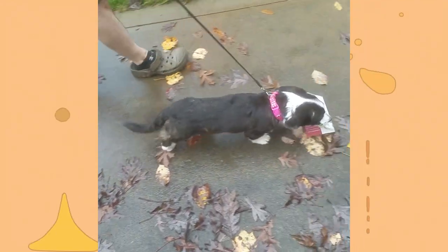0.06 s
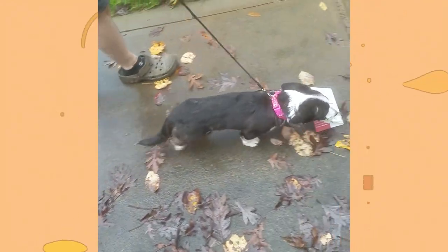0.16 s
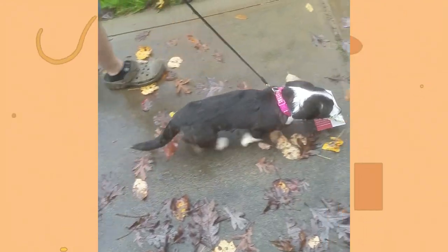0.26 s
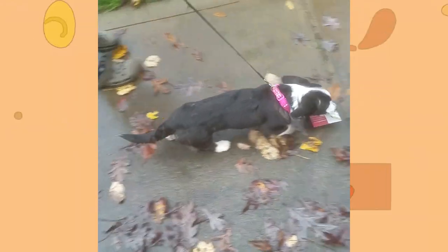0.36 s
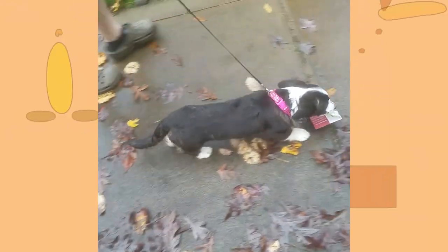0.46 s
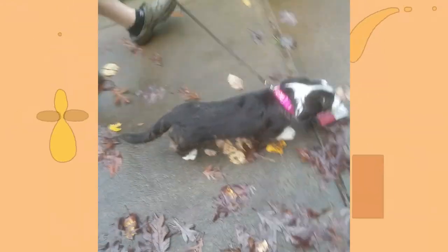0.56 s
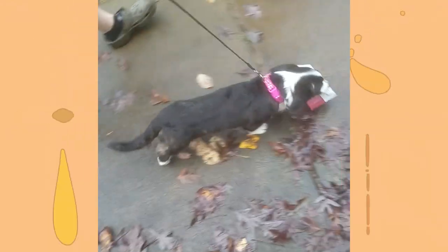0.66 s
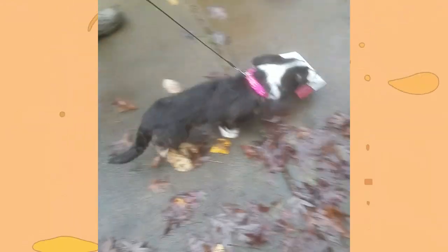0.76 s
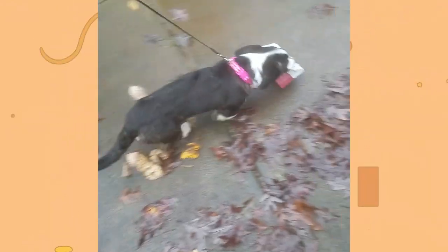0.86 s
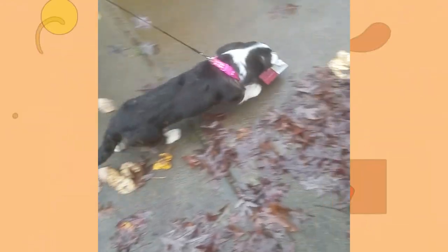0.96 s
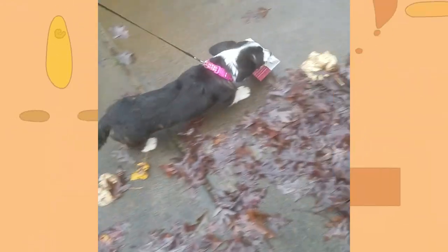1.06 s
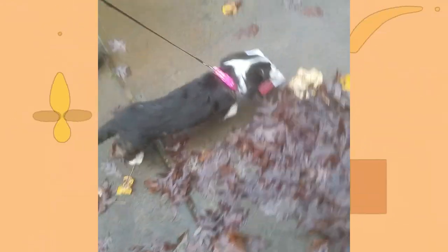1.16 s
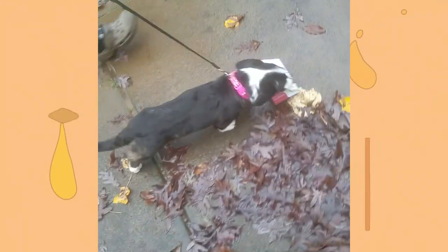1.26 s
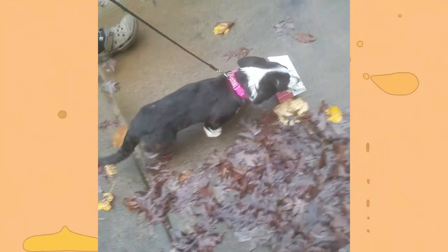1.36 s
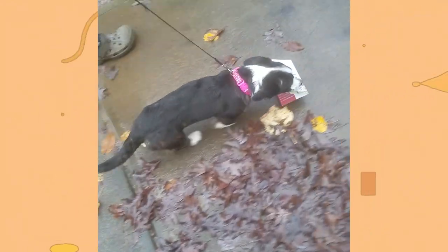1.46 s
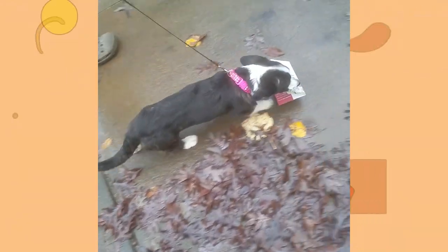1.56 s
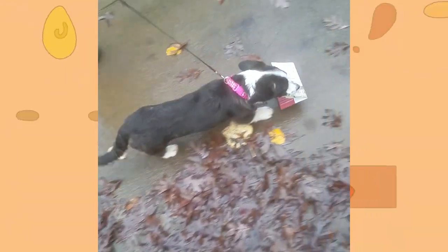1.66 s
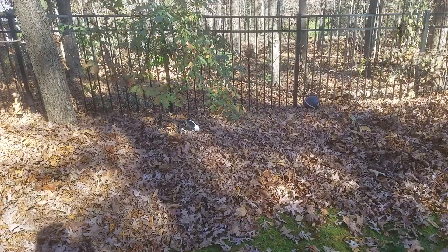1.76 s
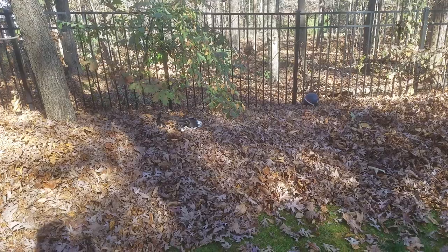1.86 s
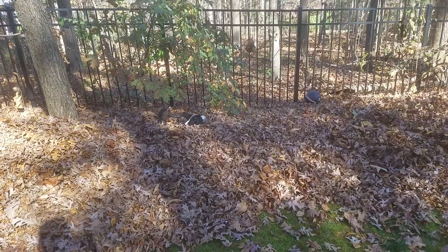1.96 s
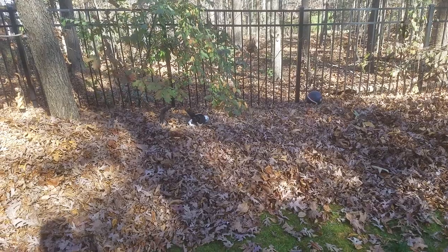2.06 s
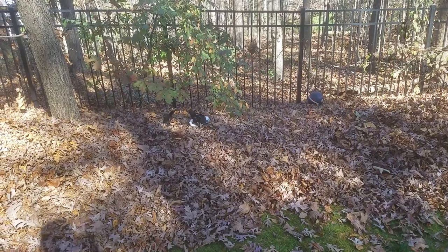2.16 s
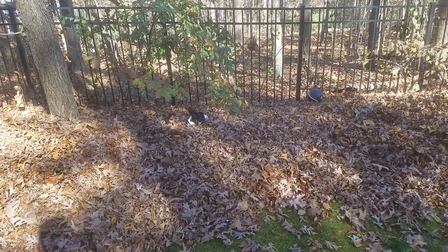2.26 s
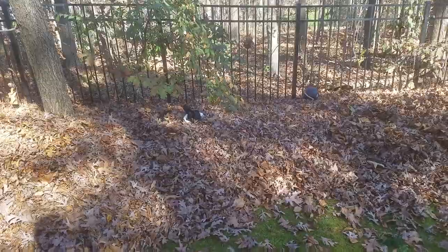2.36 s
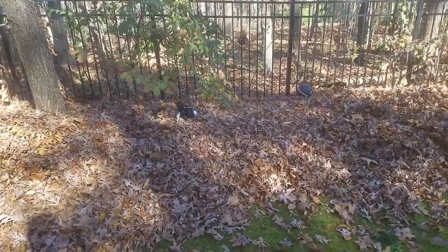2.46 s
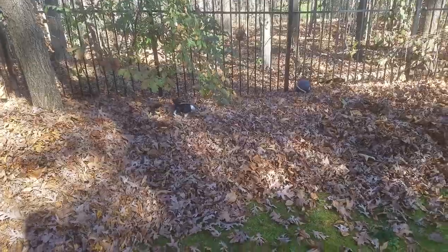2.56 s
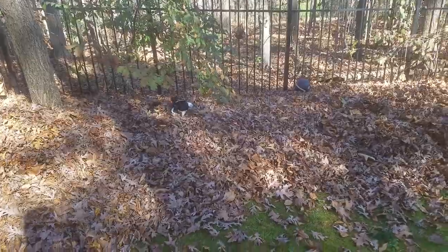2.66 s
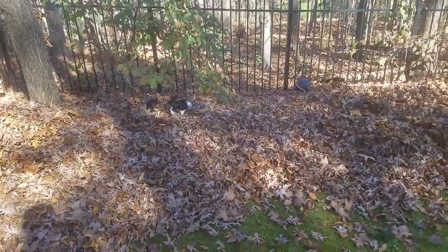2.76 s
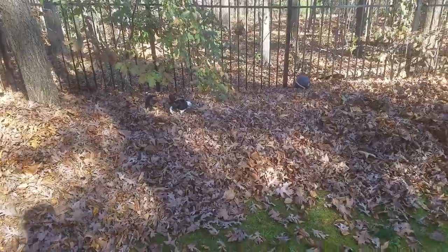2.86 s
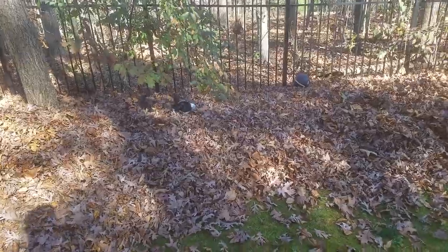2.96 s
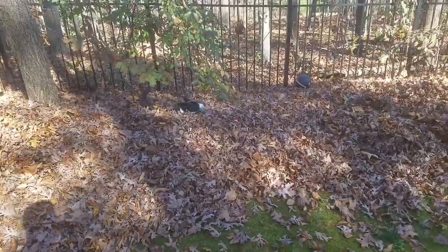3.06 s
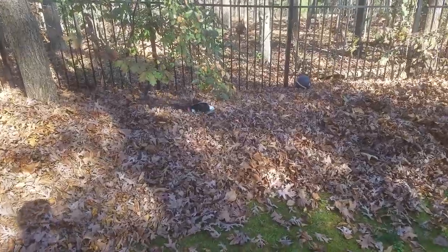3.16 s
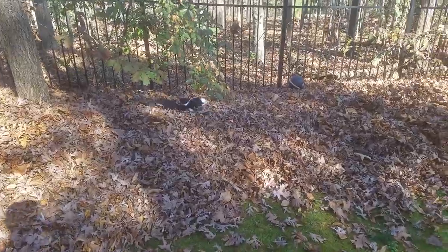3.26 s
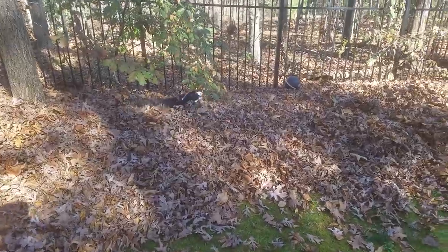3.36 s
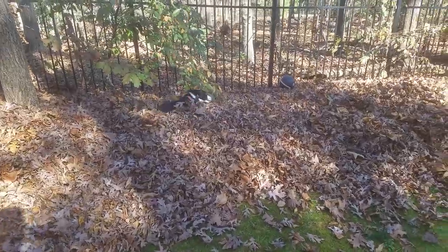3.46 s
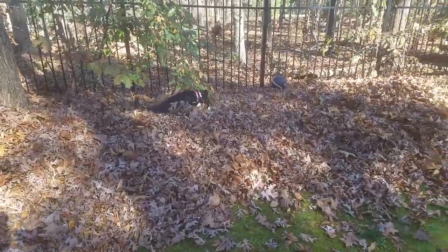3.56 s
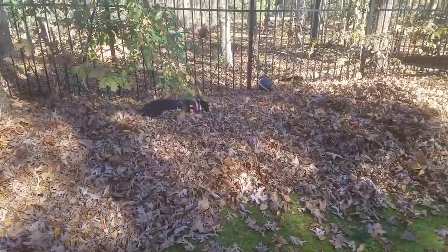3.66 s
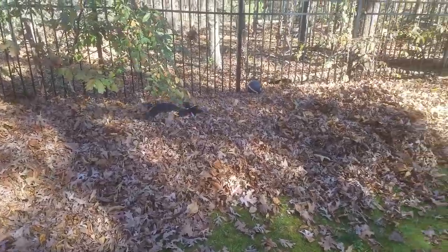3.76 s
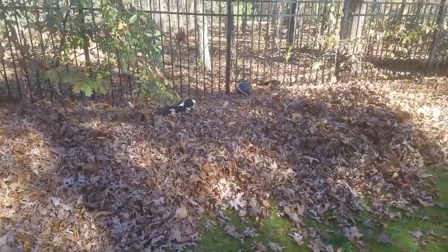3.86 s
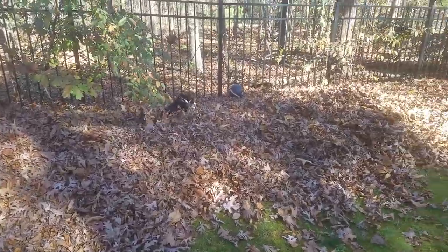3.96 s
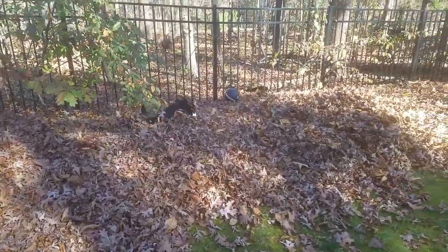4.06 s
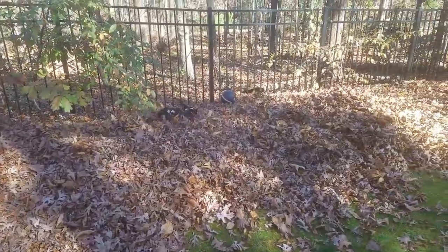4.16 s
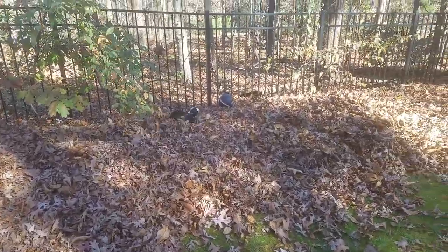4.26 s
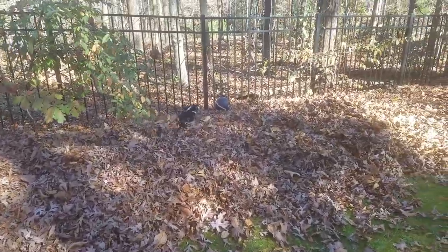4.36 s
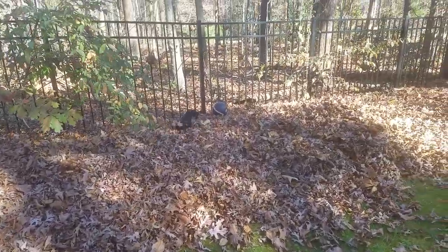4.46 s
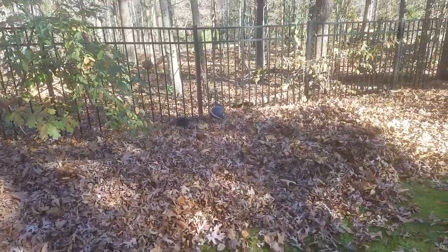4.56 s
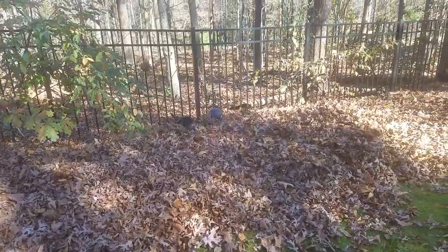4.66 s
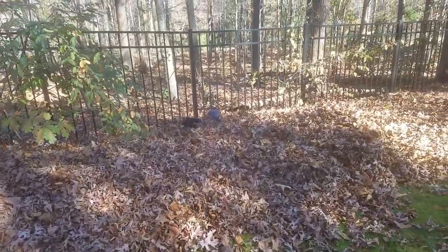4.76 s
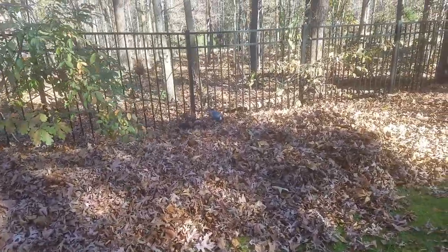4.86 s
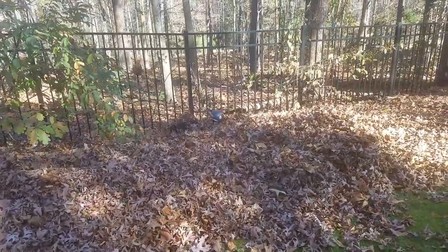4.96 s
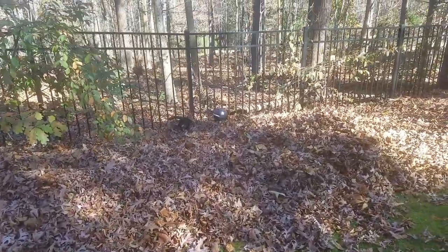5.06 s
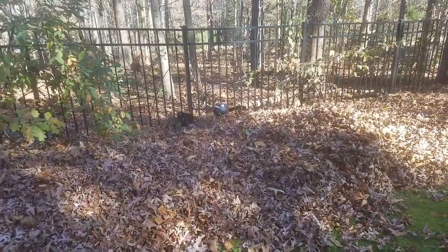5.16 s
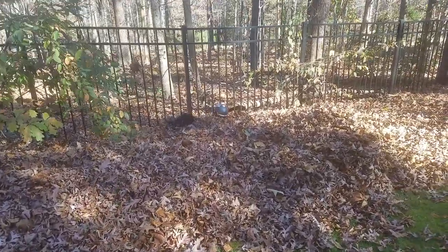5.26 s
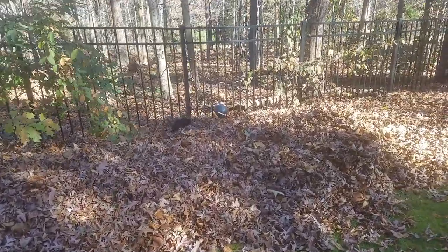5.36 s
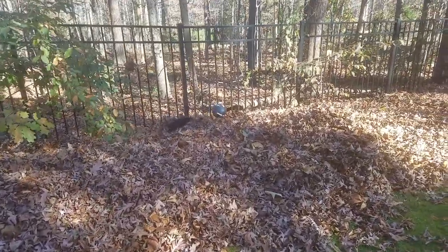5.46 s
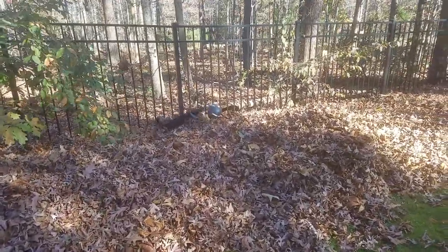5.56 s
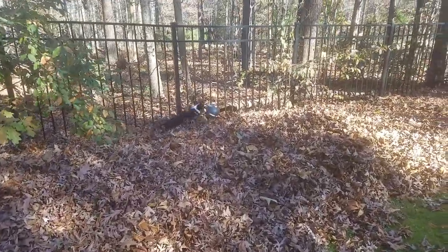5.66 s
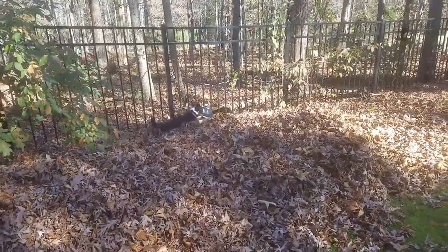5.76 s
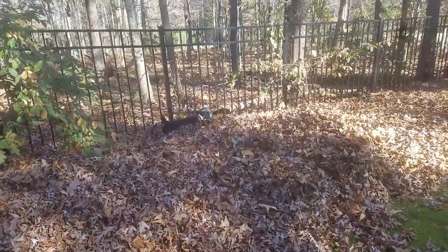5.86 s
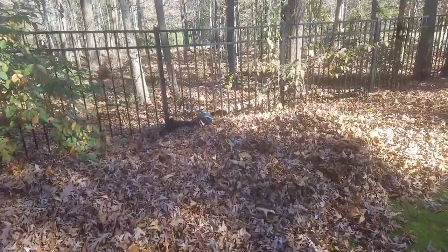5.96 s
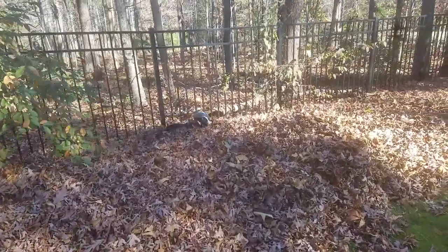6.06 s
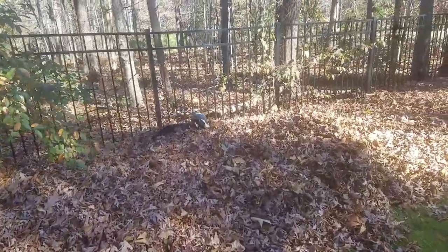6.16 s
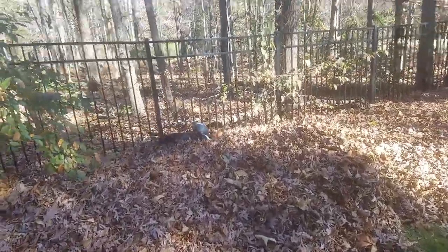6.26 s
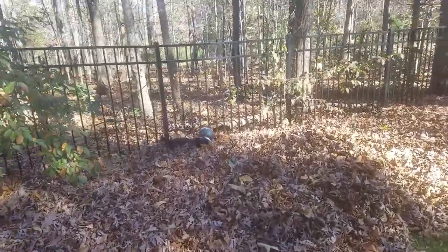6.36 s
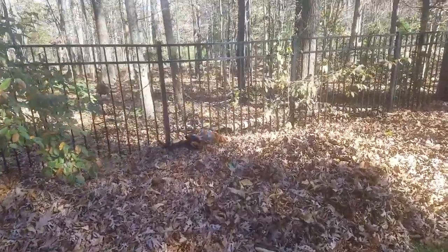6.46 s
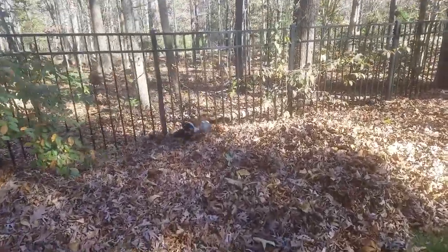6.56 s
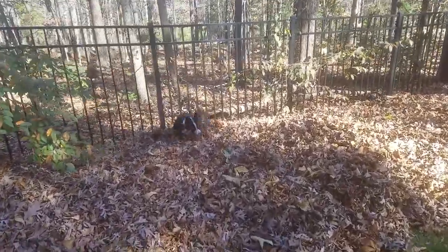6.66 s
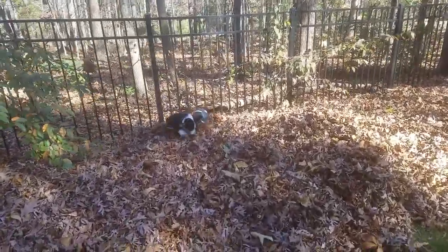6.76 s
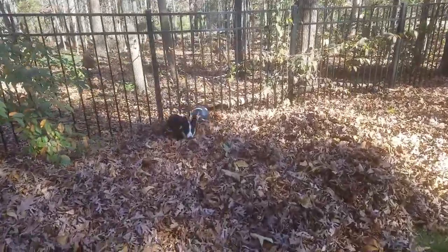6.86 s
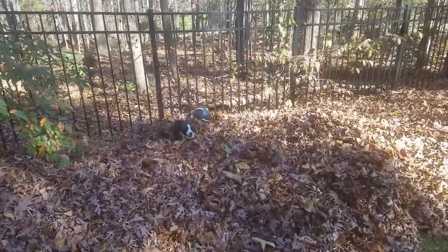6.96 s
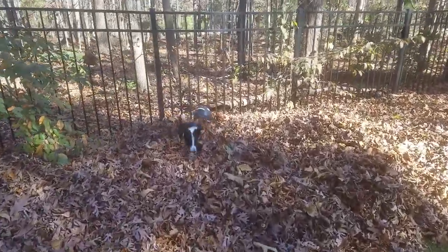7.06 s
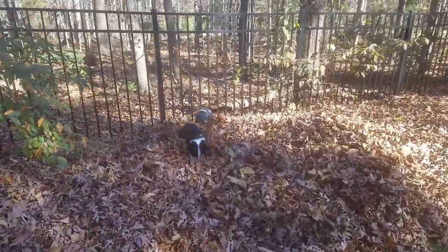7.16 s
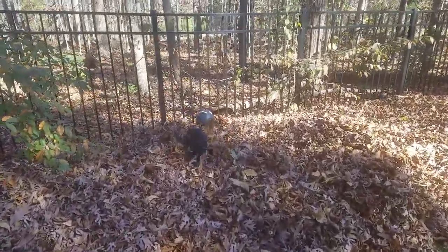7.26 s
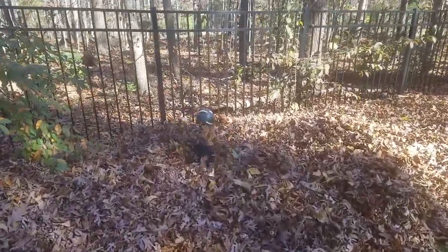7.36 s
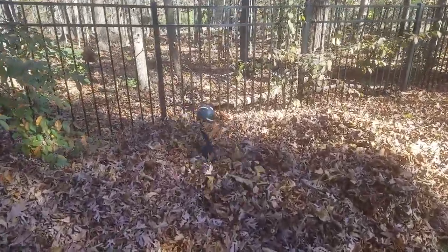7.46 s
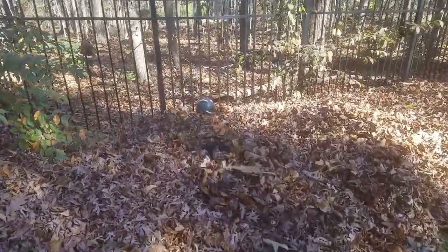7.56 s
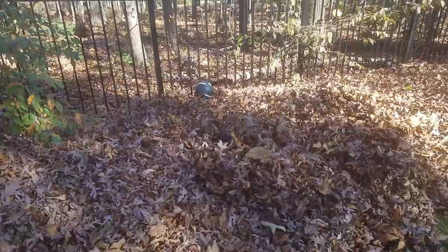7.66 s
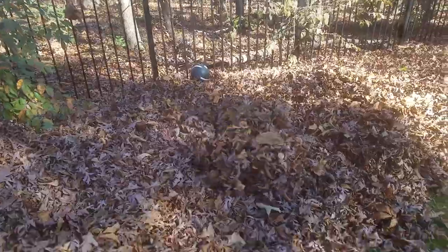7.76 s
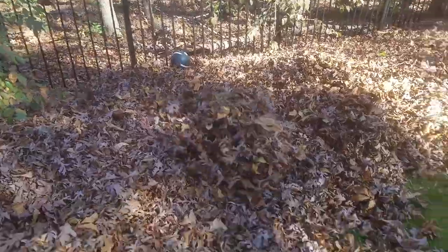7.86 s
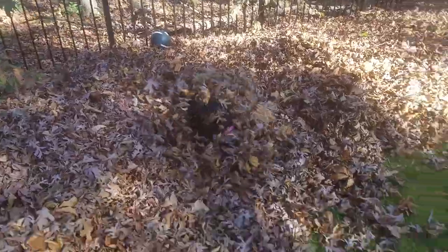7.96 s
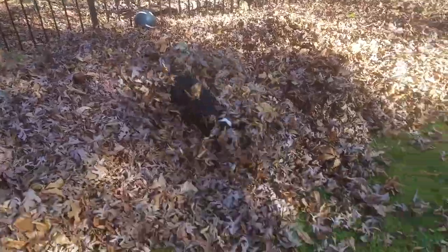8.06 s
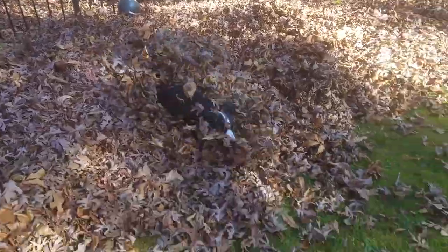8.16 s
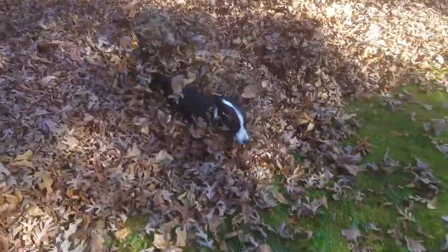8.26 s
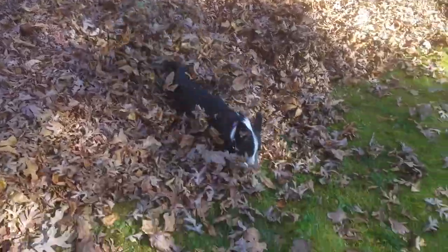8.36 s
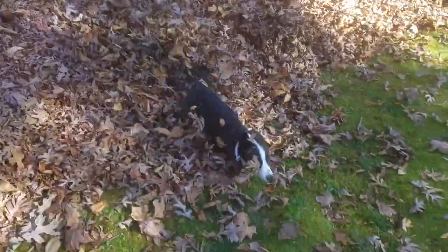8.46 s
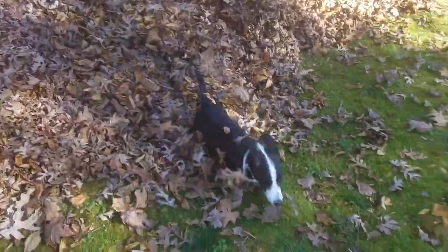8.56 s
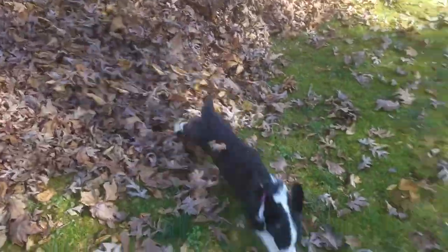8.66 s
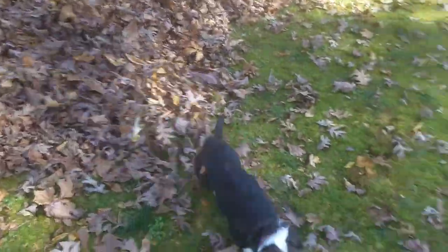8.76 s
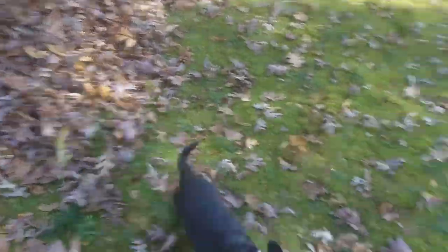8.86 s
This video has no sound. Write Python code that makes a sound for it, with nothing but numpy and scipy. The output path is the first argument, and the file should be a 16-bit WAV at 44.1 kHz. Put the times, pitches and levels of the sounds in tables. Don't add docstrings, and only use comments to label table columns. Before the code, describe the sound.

Outdoors, close handheld stereo microphone. First, very soft wet scrapes, claw ticks and sole drags on a path. A hard cut, then a deep dry leaf pile: distant swishing in rhythmic shoves, a cluster of dry twig snaps, a lull with separate rustles, and finally fast bounding crunches that grow loud and bright as the puppy arrives. Faint traffic rumble and low pile thumps sit below.

```python
import sys
import numpy as np
from scipy import signal
from scipy.fft import rfft, irfft, next_fast_len
from scipy.io import wavfile
from scipy.ndimage import uniform_filter1d, map_coordinates

SR = 44100
rng = np.random.default_rng(int(sys.argv[2]) if len(sys.argv) > 2 else 0)


def transcribe(signal):
    frames = np.atleast_2d(signal).T
    limited = np.clip(frames, -1, 1)
    pcm = np.round(limited * 32767).astype(np.int16)
    wavfile.write(sys.argv[1], SR, pcm)


def convert_level_to_amplitude(level_db):
    exponent = np.asarray(level_db, float) / 20
    return 10 ** exponent


N = 392931
PATH_SIZE = int(1.8 * SR)
PATH_END_S, YARD_START_S = 1.7385, 1.7512


def unit(x):
    return x / np.sqrt(np.mean(x ** 2) + 1e-20)


def along(points, hz):
    f, value = np.transpose(points)
    return np.interp(np.log(hz + 1), np.log(f + 1), value)


def curves(rows):
    s, *columns = np.transpose(rows)
    return [np.interp(np.arange(N) / SR, s, column) for column in columns]


def wobble(rate_hz):
    steps = np.arange(0, N + 32, 32)
    knots = rng.standard_normal(int(N * rate_hz / SR) + 4)
    return np.interp(np.arange(N), steps, map_coordinates(knots, [steps * rate_hz / SR]))


def filtered(x, response):
    m = next_fast_len(x.shape[-1] + 8192, True)
    return irfft(rfft(x, m) * response(np.fft.rfftfreq(m, 1 / SR)), m)[..., :x.shape[-1]]


def crackle(count, cycles, spread_db, size=N):
    draw = rng.random((count, 4))
    hz = np.geomspace(400, 16000, 300)[:, None]
    turns = hz * np.arange(96) / SR
    shapes = hz * np.sin(2 * np.pi * turns) * turns * np.exp(-turns / cycles)
    force = convert_level_to_amplitude(-spread_db * np.log(draw[:, 2:3] + 0.019)) * np.sign(draw[:, 3:] - .5)
    grains = force * shapes[(draw[:, 1] * len(hz)).astype(int)]
    at = (draw[:, :1] * size).astype(int) + np.arange(turns.shape[1])
    return unit(np.bincount(at.ravel(), grains.ravel(), size + turns.shape[1])[:size])


def patchy(depth_db, size=N):
    z = signal.stft(rng.standard_normal((2, size)), nperseg=512)[2]
    field = uniform_filter1d(rng.standard_normal(z.shape[1:]), size=8, axis=0)
    field = uniform_filter1d(field, size=6, axis=1)
    return unit(signal.istft(z * convert_level_to_amplitude(depth_db * unit(field)), nperseg=512)[1][:, :size])


def ports(pair, spectrum, alike, lean, lead):
    m = next_fast_len(pair.shape[1] + 8192, True)
    hz = np.fft.rfftfreq(m, 1 / SR)
    turn = np.arccos(np.clip(along(alike, hz), -1, 1)) / 2
    mid, side = rfft(pair, m) * convert_level_to_amplitude(along(spectrum, hz)) * [np.cos(turn), np.sin(turn)]
    half = convert_level_to_amplitude(along(lean, hz) / 2) * np.exp(.5j * along(lead, hz))
    return unit(irfft([(mid + side) * half, (mid - side) / half], m)[:, :pair.shape[1]])


def played(x, level_db, shifts_db, edges_hz, main):
    below = list(filtered(x, lambda hz: 1 / (1 + (hz / np.reshape(edges_hz, (-1, 1, 1))) ** 6)))
    ranges = list(np.diff([0 * x, *below, x], axis=0))
    body = ranges.pop(main)
    gain = convert_level_to_amplitude(level_db) / np.sqrt(np.mean(body.mean(0) ** 2))
    return gain * (body + sum(convert_level_to_amplitude(db) * part for db, part in zip(shifts_db, ranges)))


# t/s, effort/dB, depth in the leaves/dB
PLOUGH = [(1.75, -59, 2.5), (2.75, -58, 4), (2.95, -47, 2), (3.6, -46, 2.5), (4.2, -46, 2.5),
          (4.7, -45.5, 1.5), (5.3, -46, 1), (5.6, -51.5, -2), (6.05, -58, 1.5), (6.62, -50, -2),
          (6.75, -39, 0), (7.2, -45.5, 1), (7.35, -41, 5.5), (7.5, -37, 3.5), (8.15, -35, 0.5),
          (8.47, -34.5, 0), (8.52, -39, -2.5), (8.91, -47, -0.5)]
# t/s, swell/dB, fall/s
STRIDES = [(1.949, 2.5, 0.074), (2.153, 3, 0.021), (2.318, 1.5, 0.013), (2.96, 2, 0.0094), (3.07, 0.5, .02),
           (3.213, 6.5, 0.12), (3.602, 8.5, 0.12), (3.73, 1.5, 0.022), (3.804, 6, 0.066), (3.98, 2, 0.022),
           (4.157, 7, 0.16), (4.433, 3.0, 0.029), (4.645, 6.5, 0.27), (5.155, 2, 0.07),
           (5.68, -0.5, 0.0092), (5.922, 11, 0.18), (6.167, 9.5, 0.051), (6.328, 11, 0.078),
           (6.522, 8, 0.093), (6.97, 1, .015), (7.026, 4, 0.074), (7.25, 7.5, 0.1), (7.35, 0, .02),
           (7.478, 5.5, 0.053), (7.63, 2, 0.022), (7.72, 1, 0.031), (7.79, 3.5, 0.07), (7.938, 4.5, 0.04),
           (8.1, 3.5, 0.026), (8.135, 4, 0.01), (8.184, 3, 0.017), (8.383, 4.0, 0.034), (8.655, 7.5, 0.029),
           (8.888, 5.5, 0.0054)]
USUAL_EFFORT_DB = -41


def ploughing():
    effort_db, depth_db = curves(PLOUGH)
    s, swell_db, fall = np.transpose(STRIDES)
    rise_over_fall = 1.49
    t = np.arange(0, N, 32) / SR
    late = (t[:, None] - s) / fall
    swell = np.exp(-np.where(late < 0, late / rise_over_fall, late) ** 2) @ swell_db
    return effort_db, depth_db, np.interp(np.arange(N) / SR, t, swell)


# t/s, level/dB
TRAFFIC_LEVEL = [(0.0, -79), (0.05, -72.5), (1.59, -73.5), (1.64, -63), (1.69, -74.5), (1.81, -55.5),
                 (2.38, -66.5), (4.57, -70), (4.89, -59), (4.91, -66.5), (6.97, -71), (7.5, -55),
                 (8.14, -55.5), (8.19, -45), (8.22, -56), (8.91, -55.5)]
# f/Hz, level/dB per Hz
TRAFFIC_SPECTRUM = [(15, -46), (25, -18), (52, -2), (75, -0.5), (108, 2), (200, -14), (260, -35),
                    (440, -120)]


def traffic(air):
    level_db, = curves(TRAFFIC_LEVEL)
    alike = [(40, .2), (80, 0.73), (150, 0.68)]
    rumble = ports(air, TRAFFIC_SPECTRUM, alike, [(100, -3.5)], [(100, 0.74)])
    return convert_level_to_amplitude(level_db + 2.0 + 2.7 * wobble(7)) * rumble


# f/Hz, level/dB per Hz
THRASH_SPECTRUM = [(88, -26), (150, -3), (280, 1), (340, -1), (420, -3), (580, -8), (990, -120)]
# t/s, level/dB, spread/s
PAW_THUDS = [
    (1.26, -66, 0.033),
    (1.95, -60, 0.15),
    (4.1, -56, 0.065),
    (4.75, -55, 0.067),
    (3.3, -54, 0.055),
    (6.4, -60.5, .06),
    (9.9, -48, .05),
    (7.3, -47, 0.093),
    (8.35, -43, .04),
]


def thrash(air):
    t = np.arange(N) / SR
    effort_db, depth_db, swell_db = ploughing()
    work_db = uniform_filter1d(effort_db + swell_db, round(0.17 * SR)) - USUAL_EFFORT_DB
    charge_s, charge_rise_s, charge_db = 7.11, 0.26, 11
    charge = charge_db * np.clip((t - charge_s) / charge_rise_s, 0, 1)
    pile = convert_level_to_amplitude(-63.5 + 0.91 * work_db + charge)
    hum = convert_level_to_amplitude(np.where(t > YARD_START_S, -64, -71))
    paws = sum(convert_level_to_amplitude(db) * np.exp(-((t - s) / spread) ** 2) for s, db, spread in PAW_THUDS)
    boom = ports(air, THRASH_SPECTRUM, [(200, 0.86)], [(200, -3.5)], [(200, 0.63)])
    return convert_level_to_amplitude(1.7 * wobble(8.3)) * np.sqrt(pile ** 2 + hum ** 2 + paws ** 2) * boom


def rumble():
    air = patchy(1.0)
    return traffic(air) + thrash(air[:, ::-1])


# t/s, scrape/dB, weight/dB
SCUFF = [
    (0.0, -67.5, 0.5),
    (0.362, -66, 7),
    (0.46, -68, 4.5),
    (0.822, -71, 1),
    (1.022, -69, 3.5),
    (1.138, -66, -1),
    (1.594, -72, 4),
    (1.74, -69.5, 1.5),
]
# f/Hz, level/dB per Hz
PAVING = [(88, -12), (150, -3), (258, -9), (352, -3.5), (618, -1), (751, -4), (2020, -2.5), (3220, -5.5),
          (3620, -6.5), (4060, -7), (9000, -15), (11600, -12), (15500, -11)]
# f/Hz, left-right likeness
PATH_ALIKE = [(100, 0.99), (300, 1), (640, 0.36), (1500, 0.036), (15000, .03)]
# f/Hz, left-right level/dB
PATH_LEAN = [(60, 1), (180, 1), (550, -2.5), (1650, -1.5), (4970, 0), (15000, -6)]


def scuffs():
    grit = np.array([crackle(count=1200, cycles=0.75, spread_db=1.0, size=PATH_SIZE) for port in range(2)])
    raw = patchy(2.0, size=PATH_SIZE) + convert_level_to_amplitude(-9.5) * grit
    scrape_db, weight_db = np.array(curves(SCUFF))[:, :PATH_SIZE]
    bed = ports(raw, PAVING, PATH_ALIKE, PATH_LEAN, [(100, 0)])
    bed = played(bed, scrape_db, (weight_db + 3.0, .4), (1400, 6500), main=1)
    return convert_level_to_amplitude(1.27 * wobble(45.25)) * np.pad(bed, ((0, 0), (0, N - PATH_SIZE)))


def heel():
    land_s, peak_db, push_s = 1.6305, -33.5, .0005
    thud_hz, thud_db, t60_s = 130.5, -6, .03
    t = np.clip(np.arange(N) / SR - land_s, 0, None)
    push = np.cos(np.pi * t / push_s) * np.exp(-(t / push_s / 1.9) ** 4)
    thud = convert_level_to_amplitude(thud_db - 60 * t / t60_s) * np.sin(2 * np.pi * thud_hz * t)
    return convert_level_to_amplitude(peak_db + np.array([[-2.5], [2.5]])) * (push - thud) * (t > 0)


def snaps(rows):
    out, t = np.zeros((2, N + SR)), np.arange(512) / SR
    dip_hz, dip_depth = 9000, .65
    dip = [1, -2 * dip_depth * np.cos(2 * np.pi * dip_hz / SR), dip_depth ** 2]
    for s, db, hz, crack_db, pan_db in rows:
        ring = np.sin(2 * np.pi * hz * t) * np.exp(-t * hz / 0.98) * (1 - np.exp(-t * hz * 3))
        noise = rng.standard_normal((2, len(t))) + rng.standard_normal(len(t))
        burst = signal.lfilter(np.convolve([1, -.5], dip), 1, noise) * convert_level_to_amplitude(-60 * t / 0.006)
        crack = convert_level_to_amplitude(crack_db + 11.5) * burst / np.abs(burst).max()
        ring_share = np.sqrt(np.clip(1 - convert_level_to_amplitude(crack_db) ** 2, .05, 1))
        start = round((s + 0.000965) * SR)
        gain = convert_level_to_amplitude(db + 3.5 + np.array([[pan_db], [-pan_db]]) / 2)
        out[:, start:start + len(t)] += gain * (ring_share * ring + crack)
    return out[:, :N]


# t/s, peak/dB, pitch f/Hz, bright crack/dB, left-right/dB
CLAWS = [(.013, -37.5, 1630, -10, 3), (.235, -48, 3500, -10, 0), (.27, -40, 2500, -18, 0),
         (.673, -49, 3000, -9, 0), (1.042, -45, 900, -12, 0), (1.361, -54, 2000, -5, 0),
         (.33, -35.5, 1190, -22, -13), (.498, -43, 597, -0.5, -9), (.569, -56, 716, -1, -2),
         (.687, -38, 4150, -17, -2.5), (.703, -36.5, 2500, -11, -2), (.794, -39, 4390, -18, -5),
         (.973, -47, 700, 0, 0), (.932, -56, 2500, -12, 0), (.977, -43, 1500, -2, -11),
         (1.081, -43, 616, -11, -6), (1.114, -50, 600, -9.5, -6.5), (1.126, -46, 1280, -6, -8),
         (1.154, -48, 3000, 0, 0), (1.214, -45, 939, -20, -1.5), (1.287, -39.5, 1200, -1, -1),
         (1.381, -53, 3000, -3, 0), (1.57, -47, 1400, -15, 0), (1.6295, -36, 704, -15, -12)]


def claws():
    return snaps(CLAWS)


# t/s, peak/dB, pitch f/Hz, bright crack/dB, left-right/dB
STEMS = [(2.075, -37, 2540, -21, 0), (2.82, -31, 2600, -25, -7), (2.963, -32, 6000, 1, 5),
         (5.138, -26, 1500, -39, -3), (5.11, -35, 1300, -25, 0), (5.099, -31, 1100, -25, 0),
         (5.187, -38, 700, -25, 0), (5.213, -31, 894, -20, 0), (5.258, -39, 1750, -14, 0),
         (5.27, -30, 3590, -16, 2), (5.277, -32, 1290, -16, 1), (5.348, -19, 1440, -31, 3),
         (5.407, -27, 1140, -18, 1), (5.4065, -27, 3000, -17, 0), (5.508, -24.5, 3500, -8, 0),
         (5.5085, -31, 1315, -22, 0), (5.686, -31.5, 1350, -15, -.5), (5.789, -31.5, 714, -13, -1.5),
         (5.894, -30, 2790, -22, -1.5), (5.983, -23.5, 3570, -30, 8), (6.938, -23, 3500, -12, 3),
         (7.42, -18, 4250, -13, 0), (7.648, -22, 3500, -8, 0), (7.764, -14, 3700, -13, 2),
         (8.389, -23, 2750, -14, -3), (8.883, -28, 4120, -15, 2)]


def stems():
    return snaps(STEMS)


def friction(rows, squeak=False):
    out, f = np.zeros((2, N + SR)), np.fft.rfftfreq(8192, 1 / SR)
    t = np.arange(8192) / SR

    def peak(hz, width):
        return 1j * f * width / (hz * hz - f * f + 1j * f * width)

    hiss_shape = peak(9300, 7000) * peak(14400, 10500)
    for s, db, hz, length, hiss_db in rows:
        width = 770 if squeak else 1170 + 0.58 * hz
        stroke = np.clip(t / 0.0013, 0, 1) * np.clip(1 - t / length, 0, 1) ** 0.21
        slips = convert_level_to_amplitude(3.8 * np.repeat(rng.standard_normal(len(t) // 64), 64))
        rub = rng.standard_normal((2, len(t))) + 0.25 * rng.standard_normal(len(t))
        noise = rfft(rub * slips)
        body = unit(irfft(noise * peak(hz, width) ** 2))
        body = body + convert_level_to_amplitude(hiss_db) * unit(irfft(noise * hiss_shape))
        start = round(s * SR)
        out[:, start:start + len(t)] += convert_level_to_amplitude(db + np.array([[-1.], [1.]])) * stroke * body
    return out[:, :N]


# t/s, level/dB, resonance f/Hz, length/s, bright hiss/dB
DRAGS = [(0.158, -63.5, 3000, 0.046, 4.5), (0.197, -53.5, 1300, 0.043, -10),
         (0.236, -53, 2590, 0.096, -2.5), (0.243, -52, 1300, 0.06, -20), (0.265, -56, 2800, 0.013, -6),
         (0.283, -57, 5000, .012, 12), (0.296, -51, 7000, 0.01, 0), (0.668, -60, 7300, 0.024, -10),
         (0.702, -55, 3760, 0.037, -3), (0.705, -57, 7300, .03, -5), (0.803, -61, 7000, 0.024, -3),
         (1.08, -61, 800, .04, -15), (1.244, -60, 3500, 0.059, -5), (0.985, -54, 4500, 0.014, 1),
         (0.998, -53, 4500, .01, 6.5), (1.038, -49.5, 800, 0.029, -3), (1.045, -53, 3970, 0.027, -3),
         (1.12, -60, 6000, 0.031, 2), (1.349, -56.5, 5500, 0.018, -1), (1.503, -53, 4000, 0.0054, 0),
         (1.516, -59.5, 4900, 0.064, 1), (1.545, -56, 900, 0.02, -20), (1.594, -60, 4970, 0.033, -3),
         (1.622, -54.5, 5000, 0.026, -5), (1.616, -51.5, 895, 0.031, -13)]


def drags():
    return friction(DRAGS)


# t/s, level/dB, resonance f/Hz, length/s,
# bright hiss/dB
SQUEAKS = [
    (0.671, -55, 4200, 0.028, -5),
    (0.811, -50, 4400, 0.018, -3),
    (1.24, -62, 4200, .055, -3),
    (1.526, -56, 2000, 0.025, -14),
    (2.954, -37, 3050, .008, -20),
]


def squeaks():
    return friction(SQUEAKS, squeak=True)


# t/s, level/dB, resonance f/Hz, length/s, bright hiss/dB
CRUSHES = [
    (2.126, -52.5, 6000, 0.054, -1.5),
    (5.202, -39.5, 1200, .022, -9),
    (5.274, -41, 1500, 0.015, -15),
    (7.673, -27.5, 3800, 0.028, -2),
    (7.762, -25.5, 3680, 0.029, -3.5),
    (8.069, -28.5, 2780, 0.018, -12),
    (8.169, -26.5, 3020, 0.027, -9),
    (8.451, -33.5, 3000, 0.038, -10),
    (8.706, -35, 2500, 0.018, -6),
    (8.884, -39, 4100, 0.01, -7),
]


def crushes():
    return friction(CRUSHES)


def echoed(x, path):
    left_ms, right_ms, *db = curves(path)
    n = np.arange(N)
    late = [np.interp(n - ms * SR / 1000, n, port) for port, ms in zip(x, (left_ms, right_ms))]
    return convert_level_to_amplitude(db) * late


# t/s, left/ms, right/ms, left/dB, right/dB
CHEST_ECHO = [(2.3, 1.3, .98, -26, -22), (3.05, 1.38, 1.06, -19, -17), (3.4, 1.34, 1.08, -21, -11),
              (3.8, 1.43, 1.13, -20, -11), (4.15, 1.48, 1.2, -19, -20), (4.5, 1.5, 1.23, -19, -15),
              (4.8, 1.5, 1.24, -19, -15), (5.25, 1.52, 1.2, -20, -20), (5.8, 1.48, 1.18, -19, -14),
              (6.3, 1.38, 1.1, -20, -22), (6.8, 1.38, 1.09, -18, -13), (7.1, 1.3, 1.04, -21, -14),
              (7.4, 1.19, 1.23, -22, -19), (7.7, 1.07, 1.25, -19, -12), (7.95, 1, 1.26, -19, -17),
              (8.25, 1.05, 1.07, -26, -20), (8.6, 1.24, 1.31, -23, -25)]
SHOULDER_ECHO = [(2.3, 2.1, 1.4, -24, -28), (3.05, 2.14, 1.42, -18, -18), (3.75, 2.17, 1.43, -17, -24),
                 (4.15, 2.12, 1.87, -18, -16), (4.5, 2.07, 1.84, -20, -26), (5.25, 2.05, 1.85, -26, -30),
                 (5.8, 2.06, 1.87, -22, -19), (6.8, 2.1, 1.9, -25, -18), (7.1, 2.12, 1.5, -21, -18),
                 (7.4, 2.13, 1.51, -22, -16), (7.6, 1.7, 1.9, -19, -24), (7.95, 1.6, 2.25, -26, -26),
                 (8.4, 1.3, 2.25, -22, -17), (8.8, 1.3, 2.25, -26, -20)]
HAND_ECHO = [(2.3, .65, .8, -30, -30), (3.05, .67, .81, -23, -26), (3.4, .63, .81, -26, -18),
             (4.15, .65, .67, -25, -22), (4.5, .62, .63, -26, -21), (4.9, .6, .56, -28, -22),
             (5.3, .68, .6, -22, -18), (5.8, .6, .66, -27, -18), (6.8, .63, .66, -19, -28),
             (7.1, .63, .86, -25, -21), (7.7, .56, .77, -24, -28), (8.25, .7, .8, -22, -28),
             (8.6, .61, .86, -15, -21)]
# t/s, left/ms, right/ms, left/dB, right/dB
EDGE_ECHO = [(1.9, 1.5, .55, -30, -20), (2.7, 1.55, .55, -28, -24), (3.1, 1.58, .55, -19, -24),
             (3.75, 1.62, .6, -18, -30), (3.9, 1.98, .86, -24, -17), (4.4, 1.93, .84, -20, -13),
             (5, 1.83, .83, -19, -20), (5.8, 1.92, .9, -22, -19), (6.5, 1.93, .85, -24, -26),
             (7, 1.62, .85, -22, -30), (7.4, 1.52, 1.1, -22, -24), (7.7, 1.9, 1.1, -21, -14),
             (8.1, 1.9, .6, -28, -26), (8.8, 2.1, .6, -26, -17)]


def holder_echoes(straight):
    dull = filtered(straight, lambda hz: 1 / (1 + (hz / 6000) ** 2))
    body = sum(echoed(dull, path) for path in (CHEST_ECHO, SHOULDER_ECHO, HAND_ECHO))
    fingers = [np.roll(port, round(ms * SR / 1000)) for port, ms in zip(dull, (.34, .37))]
    return convert_level_to_amplitude(4) * (body + convert_level_to_amplitude(-18) * np.array(fingers) - echoed(dull, EDGE_ECHO))


# f/Hz, level/dB per Hz
LEAVES = [(210, -36), (350, -12.5), (470, -10.5), (620, -1.5), (1000, 0.5), (2070, 4.5), (2840, 0.5),
          (4500, -0.5), (5200, -4.5), (6280, -6), (7240, -12), (9940, -14), (13000, -11), (15500, -13)]
# f/Hz, left-right likeness
YARD_ALIKE = [(200, .93), (700, .97), (1200, .92), (2000, .6), (3000, .42), (4200, .62), (5400, .25),
              (8000, .33), (15000, .25)]
# f/Hz, left-right level/dB
YARD_LEAN = [(110, 5), (200, -3), (380, 0), (700, 1), (1290, -2), (2380, -2), (4400, -1.5), (6200, -0.5),
             (7300, 11.5), (15000, 3)]
# f/Hz, lead/rad
YARD_LEAD = [(100, .6), (700, .7), (1400, 1.6), (2070, 3.7), (2800, 5), (3700, 5.7), (5200, 9),
             (6200, 11.7), (7600, 16), (12800, 31), (16000, 42)]
# t/s, left-right/dB, width/dB
BEARING = [(1.75, -3.5, 3), (2.7, -3.5, 3), (3, 0.5, -1.5), (4.8, 0.2, -1), (6.3, -1, 0), (7.1, 0, 0),
           (7.4, .5, 1), (7.85, 1.1, 1), (8.91, 0.6, 1.5)]
# t/s, below the dip's edge/dB, crunch above/dB
GROUND_BOUNCE = [(1.75, 3, 0), (2.8, 2, -0.5), (3.2, 0.5, 1), (3.9, -1, -6), (4.4, -2, -9.5),
                 (5, 0.5, -3.5), (5.4, 2.5, 3), (5.7, 3, -2), (6.3, 2.5, 0), (7, 4.5, -5.5), (7.3, 1, 2),
                 (7.5, -7, -3.5), (8, -3, 0.5), (8.4, -8, 6), (8.6, -4, 4), (8.91, -5, 3)]


def leaves():
    buckles = np.array([crackle(count=24000, cycles=0.87, spread_db=0.5) for port in range(2)])
    raw = patchy(0.71) + convert_level_to_amplitude(-5.5) * buckles
    wide = ports(raw, LEAVES, YARD_ALIKE, YARD_LEAN, YARD_LEAD)
    straight = ports(raw * [[1], [0]], LEAVES, YARD_ALIKE, YARD_LEAN, YARD_LEAD)
    pan_db, width_db = curves(BEARING)
    direct = straight + convert_level_to_amplitude(width_db) * (wide - straight)
    flutter = convert_level_to_amplitude(0.46 * wobble(38) + 0.65 * wobble(70) + [pan_db / 2, -pan_db / 2])

    low_db, above_db = curves(GROUND_BOUNCE)
    effort_db, depth_db, swell_db = ploughing()
    extra_db = effort_db - USUAL_EFFORT_DB
    weight_db = depth_db - 0.5
    crunch_db = 0.8 * depth_db + 0.02 * extra_db - 0.23 * swell_db - 2.57
    bright_db = -0.51 * depth_db - 0.034 * swell_db + 0.098 * extra_db + 3
    bright_db = bright_db + 0.32 * (np.arange(N) - N / 2) / SR
    shifts_db = (weight_db + low_db, weight_db, crunch_db + above_db, crunch_db, bright_db)
    rustle = played(direct + holder_echoes(straight), effort_db + swell_db - 1.87, shifts_db,
                    (660, 1350, 1800, 2450, 6600), main=4)
    return flutter * rustle


def scene():
    in_yard = np.arange(N) / SR > YARD_START_S
    bed = np.where(in_yard, leaves(), scuffs())
    return bed + rumble() + heel() + claws() + stems() + drags() + squeaks() + crushes()


def roll_off(x):
    return signal.sosfilt(signal.butter(12, 16690, fs=SR, output="sos"), x)


def record(dry):
    t = np.arange(N) / SR
    limited = filtered(dry, lambda hz: np.where(hz < 15850, 1, convert_level_to_amplitude(-42)))
    biased = limited + np.where(t < PATH_END_S, -.00047, -.0006)
    joint = (t > PATH_END_S) & (t < YARD_START_S)
    muted = np.where(joint, convert_level_to_amplitude(-48) * limited, biased)
    return roll_off(muted)


dry = scene()
out = record(dry)
transcribe(out)
```